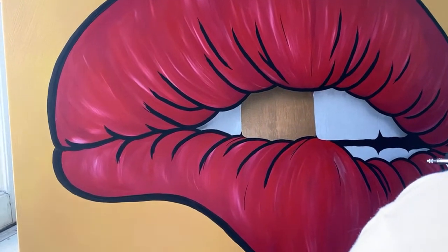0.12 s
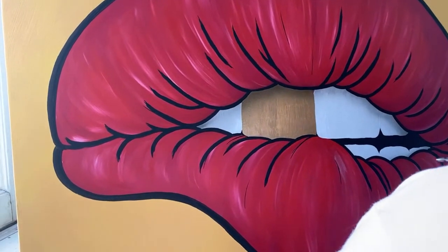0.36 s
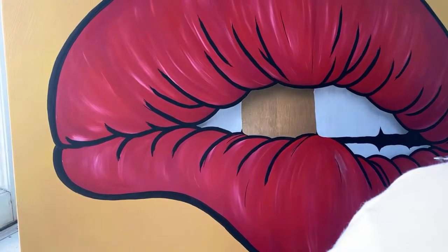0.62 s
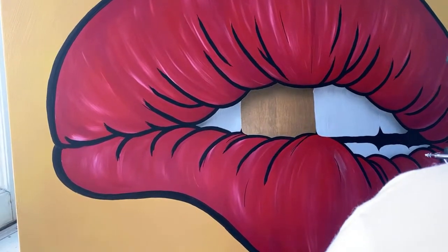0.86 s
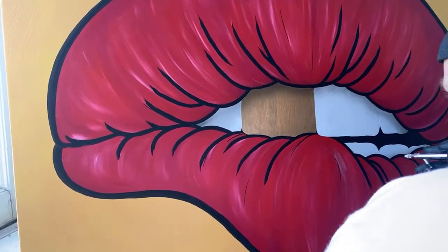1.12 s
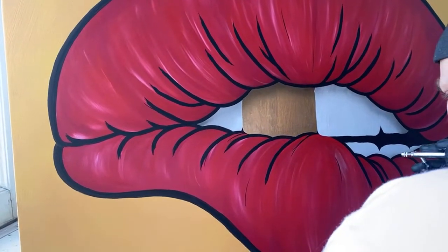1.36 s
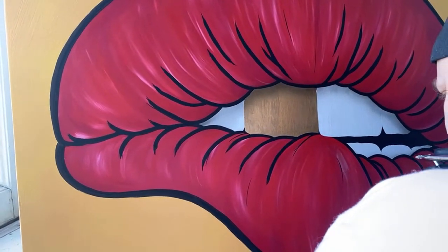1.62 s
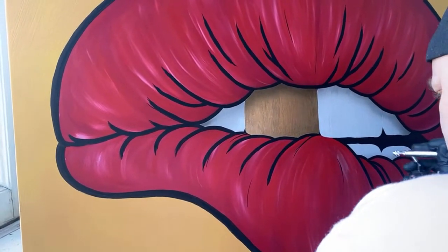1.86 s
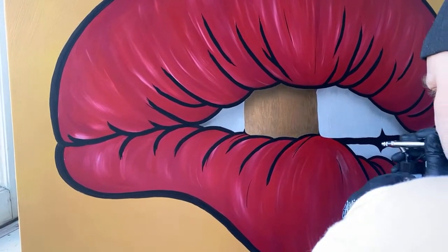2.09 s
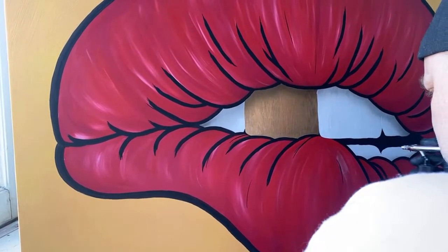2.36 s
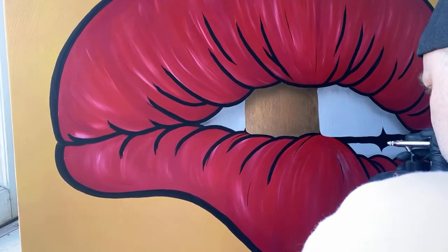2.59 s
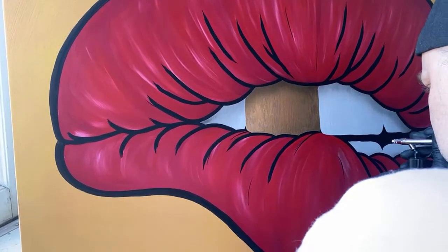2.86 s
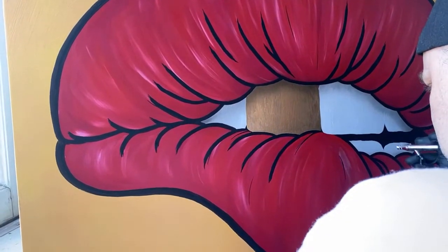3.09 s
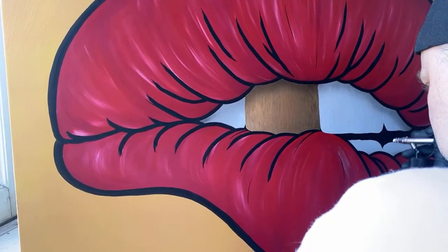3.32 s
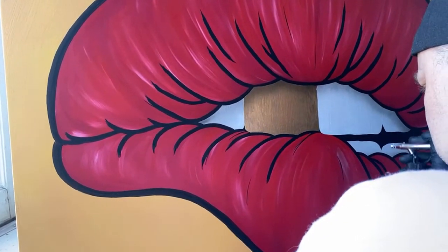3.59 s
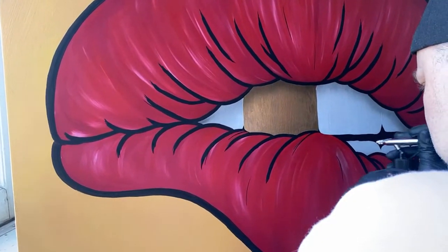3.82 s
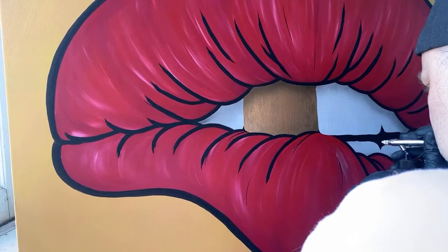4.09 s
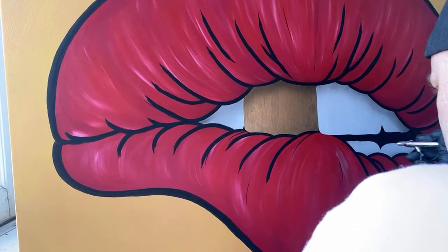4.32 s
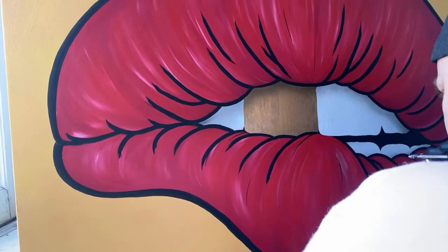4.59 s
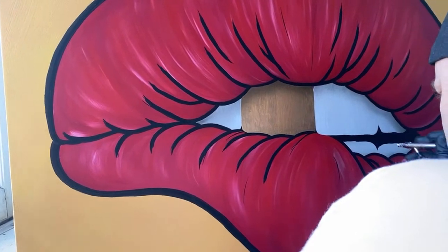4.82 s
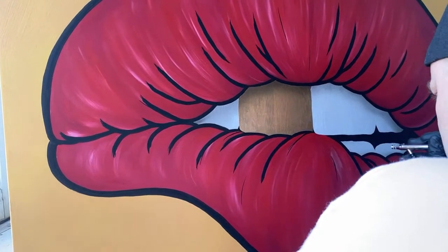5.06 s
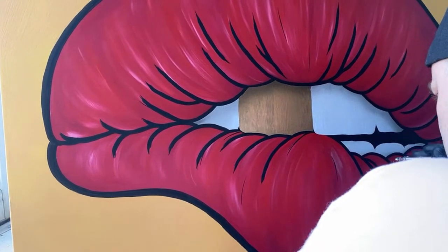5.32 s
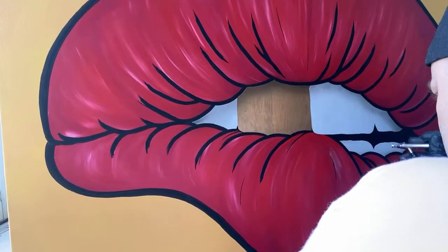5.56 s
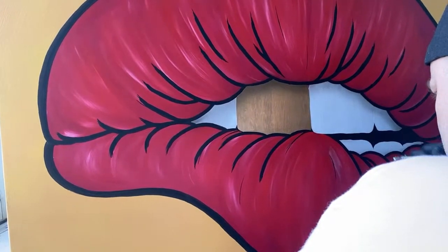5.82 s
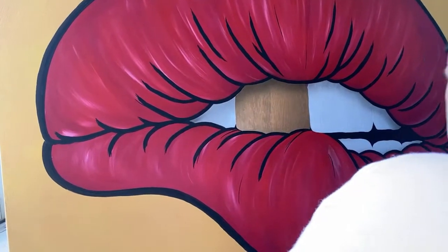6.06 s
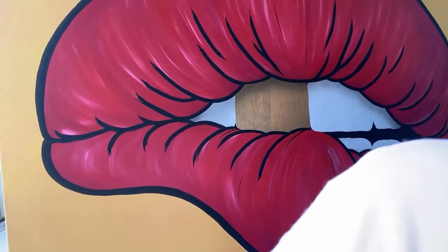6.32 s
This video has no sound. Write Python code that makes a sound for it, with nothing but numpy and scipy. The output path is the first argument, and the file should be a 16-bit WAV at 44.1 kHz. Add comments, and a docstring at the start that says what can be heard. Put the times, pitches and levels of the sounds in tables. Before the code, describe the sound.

Steady, shifting hiss of compressed air against a board, growing a low breathy howl, cutting off before one short rough burst.

```python
"""An airbrush sprays a painted board from close by: shaped noise hisses and sings in the gap between nozzle
and board, in four breathy resonances that shift as the hand moves, with short whistles on top.
The trigger is let go, then air blasts once more as a rough, broad burst of noise. A hand softly bumps the board.
An extractor fan drones as steady noise with duct resonances; the workshop adds a faint noise-like tail.
A narrow-band mono microphone channel carries it all and twice delivers a sound packet late."""
import sys
import numpy as np
from scipy import signal
from scipy.fft import rfft, irfft, next_fast_len
from scipy.io import wavfile
from scipy.ndimage import uniform_filter1d, map_coordinates

SR = 44100
rng = np.random.default_rng(int(sys.argv[2]) if len(sys.argv) > 2 else 0)


def log_audio(samples):
    """Write samples as a 16-bit WAV file to the path given in sys.argv[1]."""
    # one column per channel
    frames = np.atleast_2d(samples).T
    # limit to full scale, then quantise
    limited = np.clip(frames, -1, 1)
    pcm = np.round(limited * 32767).astype(np.int16)
    wavfile.write(sys.argv[1], SR, pcm)


def how_loud(loudness_db):
    """Turn decibels into a plain amplitude multiplier (0 dB gives 1, 20 dB gives 10)."""
    steps = np.asarray(loudness_db, float) / 20
    return 10 ** steps


N = 283556  # length of the scene, samples
FRAME = 256  # spectral frame for shaping noise, samples


def unit(x):
    """x at rms 1."""
    return x / np.sqrt(np.mean(x ** 2) + 1e-20)


def along(points, hz):
    """Reads (frequency [Hz], value) points at hz, on a log frequency axis."""
    point_hz, value = np.transpose(points)
    return np.interp(np.log(hz + 1), np.log(point_hz + 1), value)


def curves(rows, t):
    """Each column after the time, read at times t."""
    row_s, *columns = np.transpose(rows)
    return [np.interp(t, row_s, column) for column in columns]


def wobble(rate):
    """A smooth random curve, rate knots a second."""
    knots = rng.standard_normal(N // 100)
    return map_coordinates(knots, [np.arange(N) * rate / SR])


def filtered(x, gain):
    """x times a response of frequency."""
    m = next_fast_len(N + 8192)
    return irfft(rfft(x, m) * gain(np.fft.rfftfreq(m, 1 / SR)), m)[:N]


def rush(colour, patchy_db):
    """Turbulent air: coloured noise of rms 1 whose gain varies in random patches of time and frequency."""
    spectrum = signal.stft(rng.standard_normal(N), nperseg=FRAME)[2]
    patches = uniform_filter1d(rng.standard_normal(spectrum.shape), size=3, axis=0)
    patches = uniform_filter1d(patches, size=16, axis=1)
    noise = signal.istft(spectrum * how_loud(patchy_db * unit(patches)), nperseg=FRAME)[1][:N]
    return unit(filtered(noise, lambda hz: how_loud(along(colour, hz))))


def spray():
    """The jet on the board: broad hiss and gap resonances, whose unsteadiness is partly shared, partly their own."""
    # the hand sweeps to and fro; nearer the board the jet swells:
    # (time [s], top resonance of the nozzle-board gap [Hz], swell [dB])
    hand = [(0, 6310, 0), (.1, 6400, 1.5), (.37, 6420, -2), (.6, 6170, 2), (.76, 6150, 1.5),
            (.88, 6320, -3), (1.08, 6210, 2.5), (1.25, 6720, 0.5), (1.48, 6650, -2), (1.76, 6400, 1.5),
            (1.92, 6780, -1.5), (2.3, 6770, -4.5), (2.52, 6520, 2), (2.72, 6800, 0.5), (3.2, 6690, 1),
            (3.36, 6830, 0.5), (3.6, 6690, -0.5), (4.05, 6700, -4), (4.55, 6700, 1), (4.75, 6630, 5),
            (5.0, 6740, -1), (5.4, 6720, 1.5), (5.68, 6550, 0), (5.9, 6640, 1.5)]
    # tilting the nozzle feeds the third resonance and starves its neighbours:
    # (time [s], third resonance [Hz], tilt [dB])
    tilting = [(0, 5480, -4.5), (.4, 5290, 0.5), (.9, 5240, 0.5), (1.5, 5640, -2.5), (2.6, 5410, -0.5),
               (2.82, 5460, 5.5), (3.3, 5250, 0.5), (3.8, 5580, 6), (3.95, 5670, 7.5), (4.25, 5620, 5),
               (4.5, 5400, 3.5), (4.7, 5460, 9), (4.87, 5600, 5.5), (4.97, 5930, 5), (5.1, 5930, 1.5),
               (5.9, 5970, 0)]
    # the lowest resonance starts to howl and grows a shoulder:
    # (time [s], howl level [dB], shoulder over howl [dB])
    howling = [(0, -68.5, -12), (2.1, -70.5, -12), (3.0, -66.5, -12), (3.15, -71, -17), (3.5, -63.5, -12),
               (3.95, -63, -9), (4.03, -70.5, -13), (4.58, -64, -10), (4.7, -58.5, -8.5), (5.01, -58, -10),
               (5.045, -41, -19), (5.1, -47, -14), (5.18, -43.5, -16), (5.32, -40.5, -12),
               (5.4, -44.5, 1.5), (5.46, -42, 0), (5.56, -39, -9), (5.68, -44, -11), (5.8, -42.5, -4.5),
               (5.9, -40.5, -2.5), (5.98, -42, -6)]
    # a faint resonance that glides up while the nozzle tilts: (time [s], centre [Hz], level [dB])
    glide = [(.5, 4590, -75), (.62, 4610, -59.5), (.75, 5100, -66), (.95, 5330, -64), (1.1, 5430, -72)]
    # spectrum of the jet's broad hiss: (frequency [Hz], relative density [dB per Hz])
    jet_colour = [(300, -45), (900, -21), (1050, -10.5), (1370, -15), (1760, -11.5), (2820, -5.5),
                  (3660, 1), (4740, -2.5), (7000, -5.5), (12000, -12)]
    # the four gap resonances, low to high: (width [Hz], steepness below centre, steepness above)
    gap_shapes = [(400, 1.66, 0.83), (700, 0.93, 0.62), (560, 1.5, 0.86), (676, 1.1, 0.83)]
    # each resonance's own unsteadiness, low to high: (depth [dB])
    gap_flicker_db = [2.54, 0.46, 2.2, 1.8]
    # each resonance's random drift, low to high: (share of its frequency)
    gap_wander = [0.014, 0.018, .005, .012]
    # the trigger is let go: (time [s], time to fall 60 dB [s])
    release_s, release_t60 = (5.984, 0.024)
    jet_db, second_db, third_db, top_db = -53.5, -56.5, -64.5, -56  # levels at rest

    t = np.arange(N) / SR
    top_hz, swell = curves(hand, t)
    third_hz, tilt = curves(tilting, t)
    howl_db, shoulder_db = curves(howling, t)
    flutter = 0.62 * wobble(9) + 0.25 * wobble(40)  # dB, shared
    hiss_db = jet_db + 0.35 * swell + flutter + 1.2 * wobble(30)
    out = how_loud(hiss_db) * rush(jet_colour, patchy_db=1.0)

    # the lowest resonance rests at 1821 Hz and rises 4.5 Hz per dB of howl
    gap = [(1821 + 4.5 * (howl_db - howl_db[0]), howl_db),
           (0.557 * top_hz, second_db + swell - 0.5 * tilt),
           (third_hz, third_db + tilt),
           (top_hz, top_db + 1.1 * swell - 0.8 * tilt)]
    for (hz, db), shape, flicker_db, drift in zip(gap, gap_shapes, gap_flicker_db, gap_wander):
        wander = 1 + drift * wobble(12)
        unsteady_db = flutter + flicker_db * wobble(30) + 1.56 * wobble(110)
        out += singing(hz * wander, db + unsteady_db, shape)

    unsteady_db = flutter + 2.5 * wobble(30) + 1.6 * wobble(110)
    shoulder_hz = 2492 + 40 * wobble(12)
    out += singing(shoulder_hz, howl_db + shoulder_db + unsteady_db, (450, 1.3, 2.8))
    glide_hz, glide_db = curves(glide, t)
    out += singing(glide_hz, glide_db + flutter, (450, 1.4, 1.4))
    return (out + whistles()) * how_loud(-60 * np.clip(t - release_s, 0, 1) / release_t60)


def singing(centre_hz, level_db, shape):
    """One breathy resonance of the gap; centre and level are given per sample."""
    return how_loud(level_db) * breathy(lambda s: np.interp(s * SR, np.arange(N), centre_hz), shape)


def breathy(centre_hz, shape):
    """Noise of rms 1 through a steep resonance whose centre is a function of time."""
    hz, t, spectrum = signal.stft(rng.standard_normal(N), SR, nperseg=2 * FRAME)
    width, below, above = shape
    off = 2 * (hz[:, None] - centre_hz(t)) / width  # distance from the centre, in half widths
    gain = (1 + off ** 2) ** -np.where(off < 0, below, above)
    gain = gain / np.linalg.norm(gain, axis=0)  # even loudness wherever the centre is
    return unit(signal.istft(spectrum * gain, SR, nperseg=2 * FRAME)[1][:N])


def whistles():
    """Each puff is noise in one narrow band under a bell-shaped swell."""
    # short puffs and whistles as the jet crosses an edge:
    # (time [s], centre [Hz], level at the height of the swell [dB], width [Hz], length [s])
    puffs = [(0.651, 2980, -57.5, 297, 0.064), (2.272, 5650, -55, 350, .015),
             (2.598, 3040, -49.5, 120, 0.0084), (2.77, 2574, -52.5, 120, 0.015),
             (2.78, 5840, -51, 250, 0.017), (2.787, 6780, -52.5, 500, .03),
             (3.346, 3890, -45.5, 400, 0.021), (3.358, 1850, -58, 300, .02), (3.514, 1810, -59, 300, 0.011),
             (3.766, 6640, -53, 500, .025), (3.872, 5700, -47, 252, 0.024), (3.921, 5610, -46, 200, 0.033),
             (4.634, 5250, -51, 400, 0.014), (4.675, 4630, -47.5, 2500, 0.033),
             (4.68, 5640, -46.5, 497, 0.021), (4.692, 700, -69, 503, 0.21),
             (4.746, 1940, -49.5, 298, 0.015), (4.758, 5440, -47, 302, 0.031), (4.82, 1800, -55, 298, 0.01),
             (4.824, 5570, -44, 250, .012), (4.874, 1840, -50, 300, .006), (4.936, 1860, -47, 297, .009),
             (4.939, 5960, -42.5, 252, 0.0092), (4.974, 1870, -47.5, 300, .008),
             (5.086, 6810, -49, 400, 0.048), (5.181, 1830, -38, 300, 0.0069),
             (5.412, 3970, -49, 380, 0.056), (5.425, 3110, -47.5, 320, 0.055),
             (5.519, 3930, -47, 200, 0.038), (5.535, 1920, -36, 300, 0.011), (5.616, 3260, -56, 249, 0.024),
             (5.826, 7080, -48, 250, 0.02), (5.921, 3930, -51, 450, 0.05)]
    out, t = np.zeros(N), np.arange(-4096, 4096) / SR
    hz = np.fft.rfftfreq(len(t), 1 / SR)
    for s, centre, db, width, length in puffs:
        band = (1 + (2 * (hz - centre) / width) ** 2) ** -1.6
        noise = unit(irfft(rfft(rng.standard_normal(len(t))) * band))
        bell = np.exp(-2 * (t / length) ** 2)
        out[round((s + t[0]) * SR):][:len(t)] += how_loud(db) * noise * bell
    return out


def blast():
    """The valve snaps open and a rough, broad jet roars; air slips past just before it opens."""
    # free blast of air: (time [s], level [dB])
    blast_levels = [(6.33, -31), (6.42, -32.5)]
    # opening of the valve, and the short fade that ends the sound: (start [s], rise [s], end [s], fade [s])
    start, rise, end, fade = (6.321, 0.0014, 6.43, 0.007)
    # spectrum of the blast: (frequency [Hz], relative density [dB per Hz])
    blast_colour = [(150, -31), (350, -22.5), (520, -20), (730, -6.5), (1050, -13.5), (1450, -12),
                    (1900, -9.5), (2500, -13), (3300, -4.5), (4400, -4.5), (5400, -2.5), (6500, -1.5),
                    (7200, -6), (12000, -12)]
    leak_s, leak_db = 0.0082, -15  # length of the leak's rise, its level under the blast
    t = np.arange(N) / SR
    gate = np.clip((t - start) / rise, 0, 1) * np.clip((end - t) / fade, 0, 1)
    leak = np.clip((t - start) / leak_s + 1, 0, 1) * (t < start + rise)
    gate = gate + how_loud(leak_db) * leak
    rough_db = 1.6 * wobble(350)
    return gate * how_loud(curves(blast_levels, t)[0] + rough_db) * rush(blast_colour, patchy_db=3.0)


def thumps():
    """A hand bumps the board: each bump is one soft low push, a 135 Hz wave under a short bell."""
    # bumps: (time [s], level [dB])
    bumps = [(3.981, -56.5), (4.225, -58), (4.399, -63)]
    out, t = np.zeros(N), np.arange(SR // 10) / SR
    push = np.exp(-((t - .014) / 0.0047) ** 2) * np.sin(2 * np.pi * 135 * t)
    for s, db in bumps:
        out[round(s * SR):][:len(t)] += how_loud(db) * push
    return out


def workshop(x):
    """The room's answer is a noise tail in which each frequency dies at its own speed."""
    # decay of the room: (frequency [Hz], time to fall 60 dB [s])
    room_decay = [(500, 0.29), (3000, 0.25), (7000, 0.34)]
    hz, t, spectrum = signal.stft(rng.standard_normal(SR // 2), SR, nperseg=FRAME)
    decay = how_loud(-60 * t / along(room_decay, hz)[:, None])
    tail = signal.istft(spectrum * decay, SR, nperseg=FRAME)[1]
    return signal.fftconvolve(x, tail / np.linalg.norm(tail))[:N]


def fan():
    """The extractor fan: steady air noise through a few duct resonances."""
    # spectrum of the fan's air noise: (frequency [Hz], relative density [dB per Hz])
    fan_colour = [(25, -26.5), (100, -19), (200, -8.5), (350, -10), (500, -10), (800, -14), (900, -17.5),
                  (1460, -9), (4000, -19.5), (12000, -39)]
    # duct resonances: (centre [Hz], width [Hz], gain [dB])
    duct_modes = [(233, 50, 7), (362.8, 51, 11), (700, 73, 7), (787, 35, 7.5), (1050, 30, -5)]

    def duct(hz):
        return how_loud(sum(db / (1 + (2 * (hz - centre) / width) ** 2) for centre, width, db in duct_modes))

    level_db = -63.5 + 0.5 * wobble(5)
    return how_loud(level_db) * unit(filtered(rush(fan_colour, patchy_db=0.6), duct))


def scene():
    """Airbrush, its faint room tail, fan and bumps reach one microphone, so both channels are alike."""
    brush = spray() + blast()
    mono = brush + how_loud(-24) * workshop(brush) + fan() + thumps()
    return np.tile(mono, (2, 1))


def band_limit(x):
    """A steep low-pass at the top of the band."""
    return signal.sosfilt(signal.butter(12, 15700, fs=SR, output="sos"), x)


def record(dry):
    """Narrow-band channel; a late packet leaves a short silence, then plays over the start of the next."""
    # response of microphone and 16 kHz sampling, whose image leaves a bump near 9 kHz:
    # (frequency [Hz], gain [dB])
    channel_response = [(20, -18), (150, -0.5), (7050, -1.5), (7250, -14.5), (7700, -18), (8700, -33.5),
                        (8950, -26), (9400, -39), (9800, -64)]
    # packets that come late: (time [s])
    late_packets = [3.7325, 5.7525]
    packet_s, lateness_s, floor_db = 0.02, 0.004, -93.5  # floor_db: level of the digital white noise floor
    heard = filtered(dry[0], lambda hz: how_loud(along(channel_response, hz)))
    out = heard.copy()
    late, size = round(lateness_s * SR), round(packet_s * SR)
    for s in late_packets:
        i = round(s * SR)
        out[i:i + late] = 0
        out[i + late:i + late + size] = heard[i:i + size]
    out = out + how_loud(floor_db) * rng.standard_normal(N)
    return band_limit(np.tile(out, (2, 1)))


dry = scene()
out = record(dry)
log_audio(out)
```